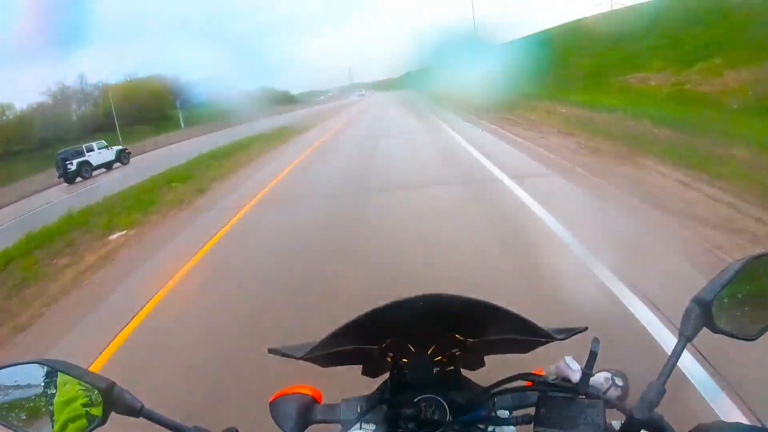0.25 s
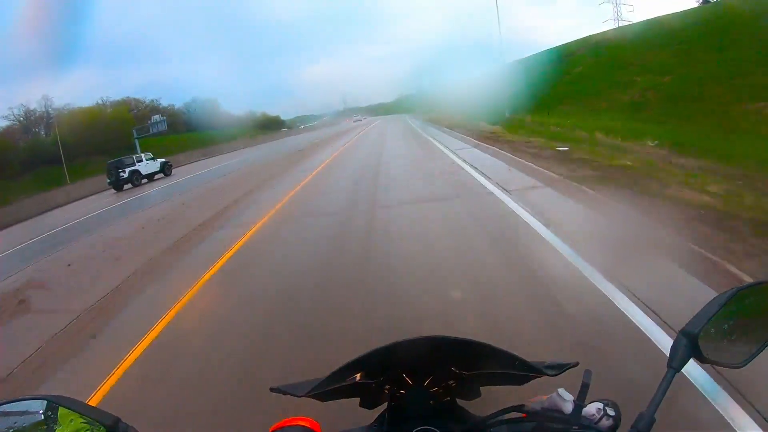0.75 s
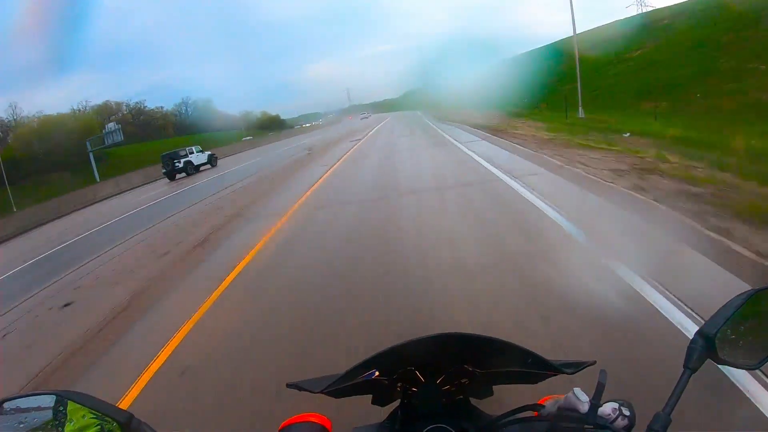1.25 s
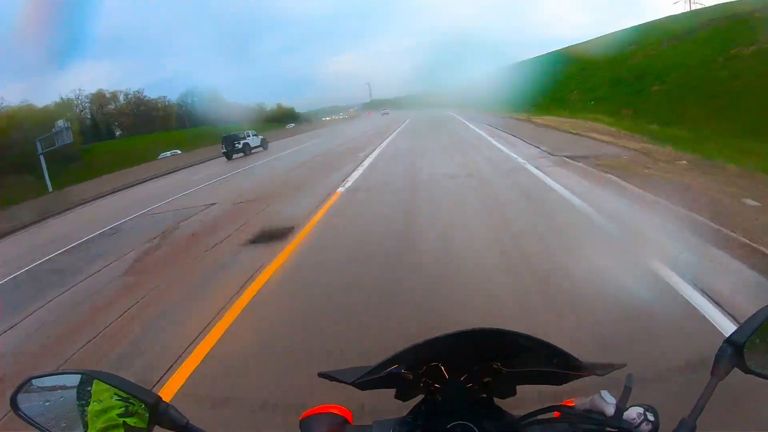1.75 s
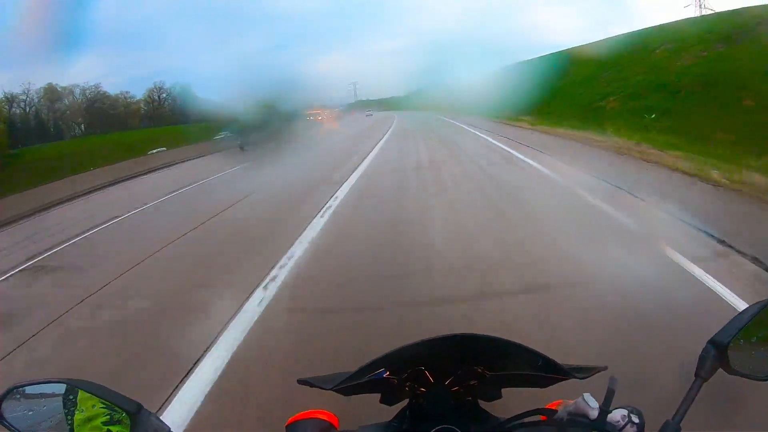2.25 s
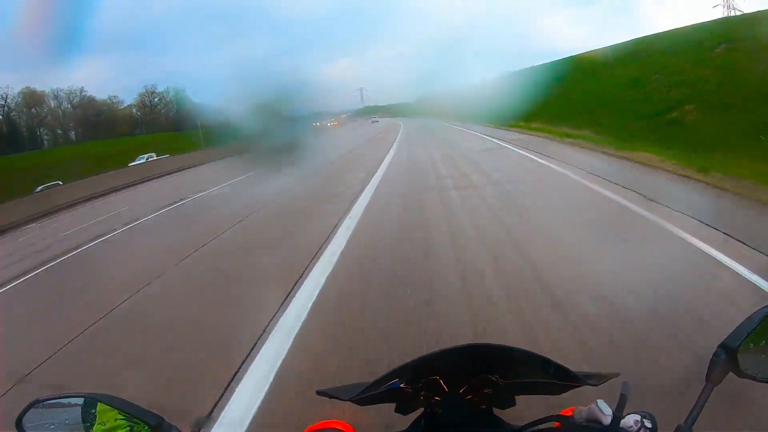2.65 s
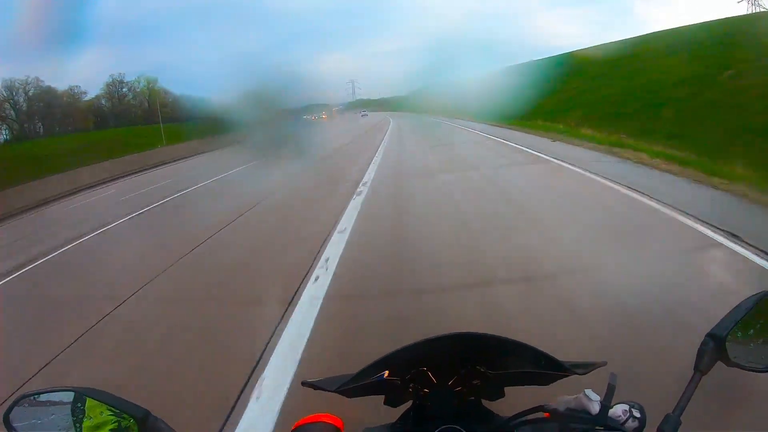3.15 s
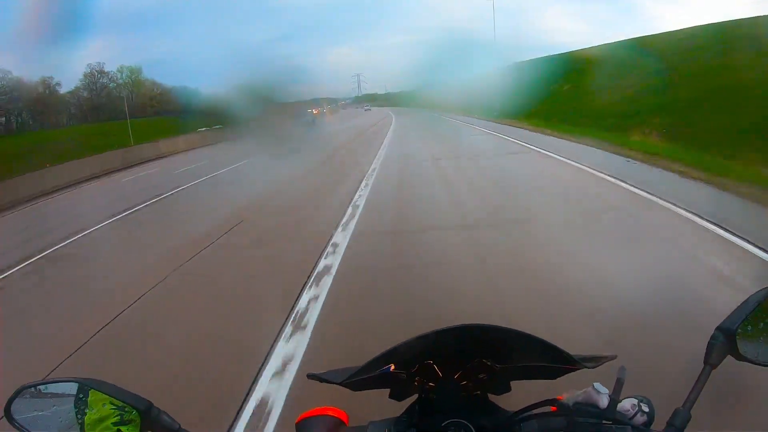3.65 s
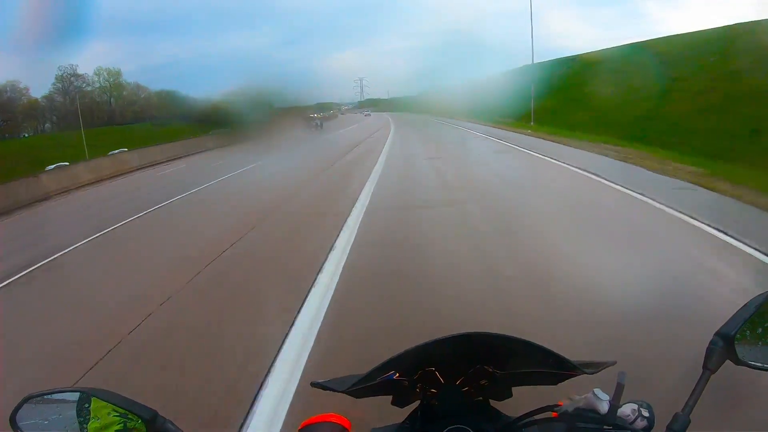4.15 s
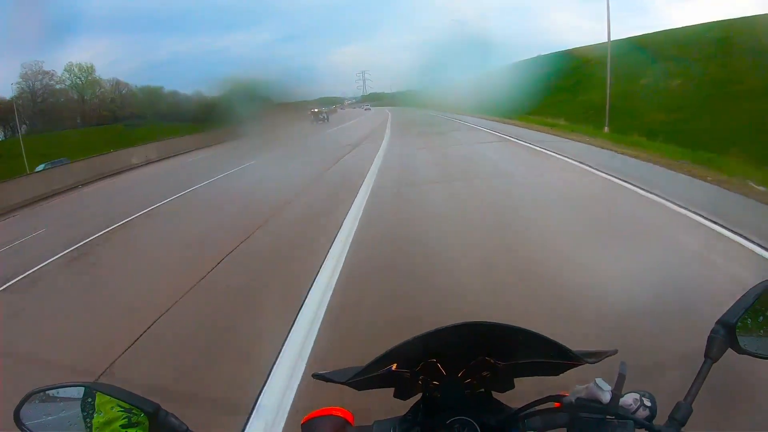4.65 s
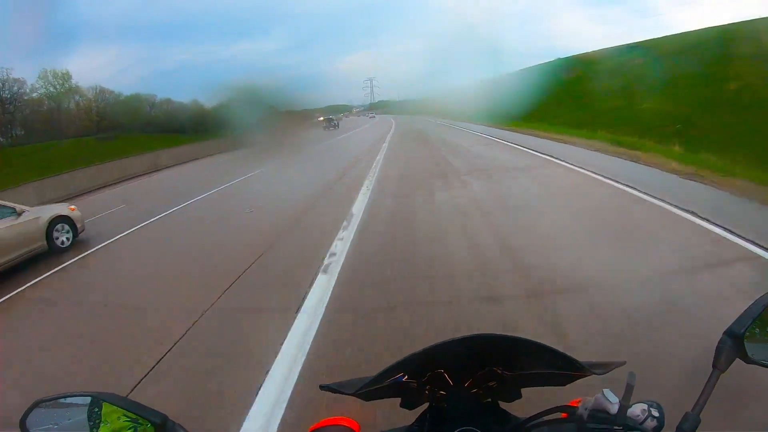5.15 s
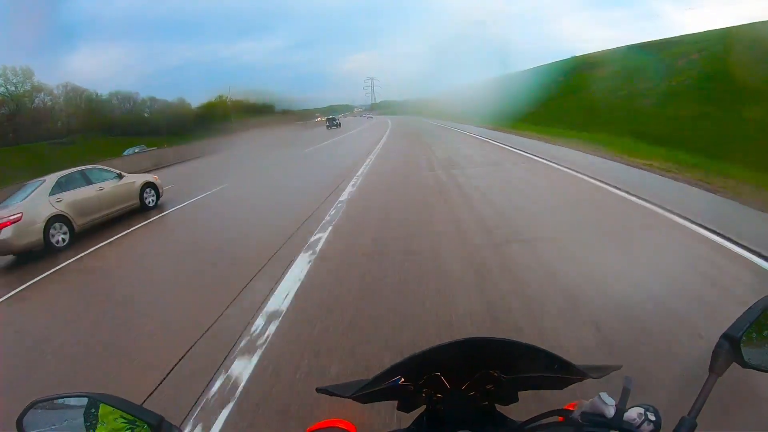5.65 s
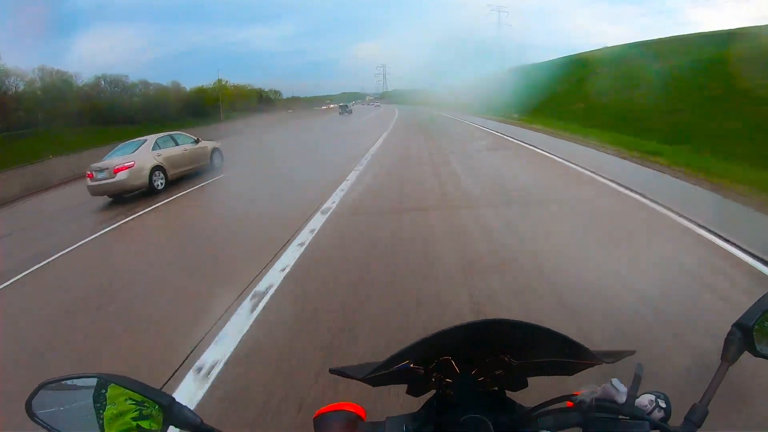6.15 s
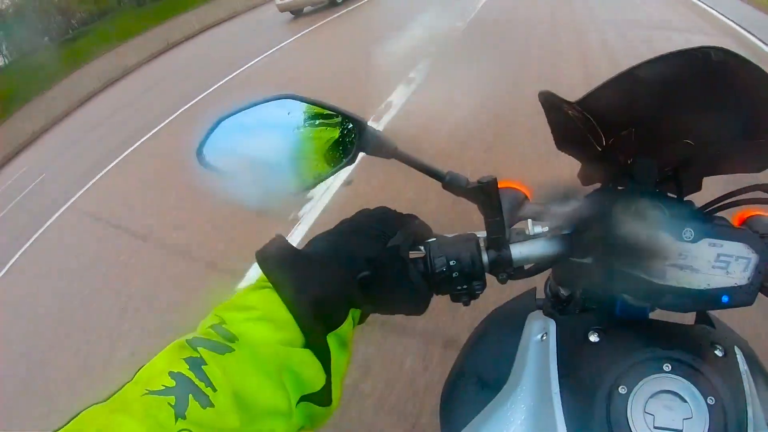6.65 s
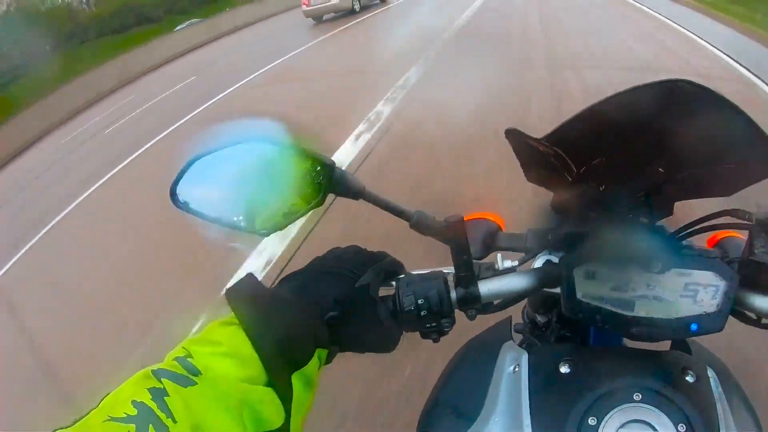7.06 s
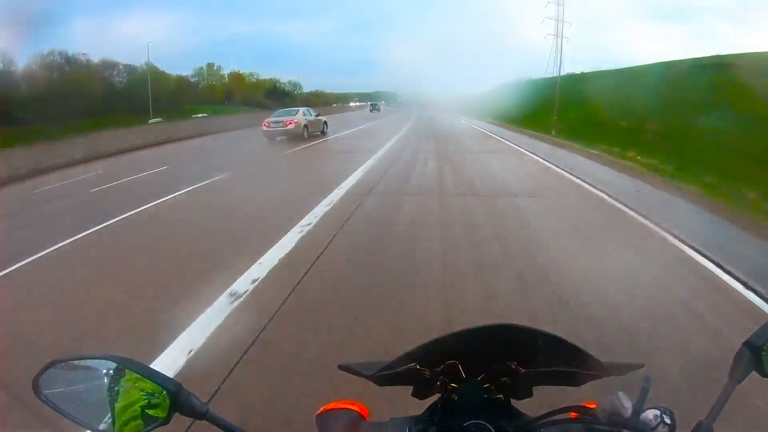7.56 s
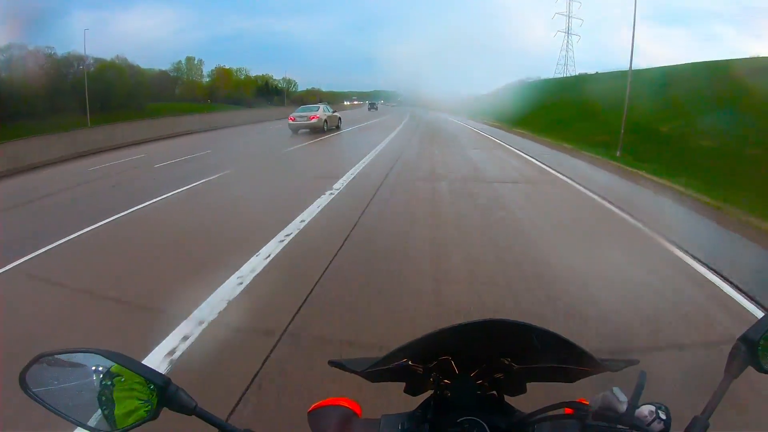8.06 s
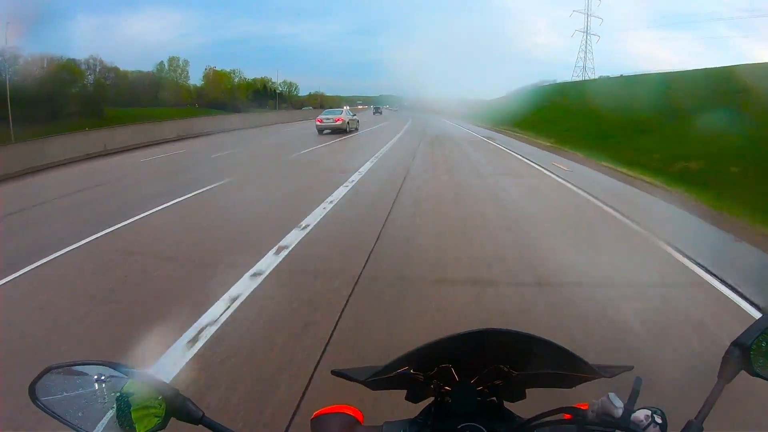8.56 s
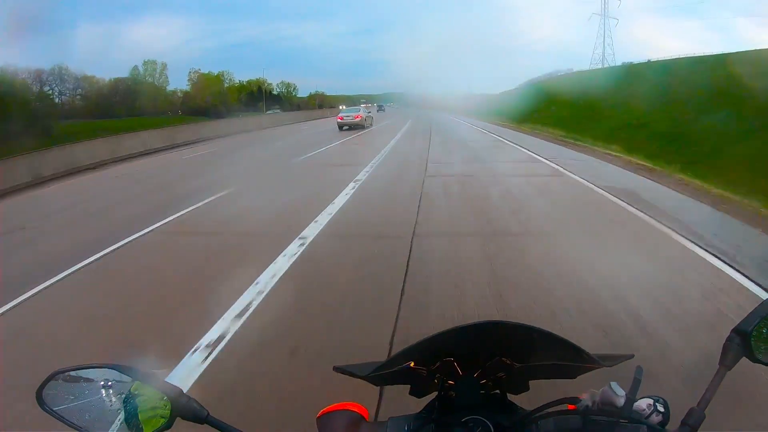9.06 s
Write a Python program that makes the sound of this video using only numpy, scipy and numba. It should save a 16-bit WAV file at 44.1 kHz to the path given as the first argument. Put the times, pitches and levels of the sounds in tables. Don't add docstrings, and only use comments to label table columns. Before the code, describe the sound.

A rider on a wet open highway, heard close and mono from the helmet. Wind overloads the microphone continuously: deep uneven throbbing, broad roaring air and an airy hiss. Blows of air cluster at the start and again after six seconds, when turning the head briefly shelters the microphone. The rush then comes back rougher and less airy on top, with tiny drop ticks almost buried.

```python
import sys
import numpy as np
from scipy import signal
from scipy.fft import rfft, irfft, next_fast_len
from scipy.io import wavfile
from scipy.ndimage import uniform_filter1d
from numba import njit

SR = 44100
rng = np.random.default_rng(int(sys.argv[2]) if len(sys.argv) > 2 else 0)


def volts(x):
    e = np.asarray(x, float) / 20
    return 10 ** e


def wav_out(sig):
    wavfile.write(sys.argv[1], SR, np.round(np.clip(np.atleast_2d(sig).T, -1, 1) * 32767).astype(np.int16))


N = 410130

# frequency in Hz, density in dB per Hz.
TYRE_SPECTRUM = [(1180, -29), (2000, -1), (2170, -7), (2640, -9), (3200, -17), (4120, -14), (4730, -8),
                 (6700, -21), (8710, -49.5), (14700, -120)]
# start in seconds, peak in dB.
DROPS = [(1.276, -68), (2.0852, -65), (2.5356, -56), (3.3697, -52.5), (3.6037, -60.5), (4.7731, -62),
         (5.3552, -58.5), (5.7588, -57), (5.9554, -66.5), (6.2896, -59.5), (6.7231, -66.5), (6.8064, -67.5),
         (7.8077, -72), (7.874, -59), (8.5265, -54), (8.7006, -63)]
# start in seconds, peak in dB, treble in dB re peak.
SLAPS = [(0.005, -18, -36), (0.078, -17.5, -15.5), (0.131, -12, -24), (0.285, -15, -17), (2.716, -10, -20),
         (3.62, -13, -22), (4.351, -14, -21), (5.298, -20, -29), (5.986, -13, -13), (6.321, -7.5, -18),
         (6.495, -14.5, -25), (6.72, -15, -17), (6.809, -11, -30), (6.854, -15, -28), (6.948, -22, -23),
         (7.029, -24, -17), (7.096, -23, -23), (7.294, -17, -10), (7.33, -11, -19), (7.473, -17, -29),
         (7.56, -7.5, -29), (7.734, -8.5, -20), (7.796, -11, -18), (8.544, -14, -18), (8.693, -15, -25),
         (8.798, -7.5, -26), (9.099, -16, -24)]

# frequency in Hz, density in dB per Hz.
STREAM_SPECTRUM = [(190, -29.5), (330, -6.5), (430, -3.5), (476, -4.5), (513, -6), (660, -7.5),
                   (1250, -10.5), (1930, -15.5), (2300, -22.5), (3570, -28.5), (4310, -35), (5550, -37.5),
                   (6700, -47), (8710, -65), (14700, -120)]
# frequency in Hz, density in dB per Hz.
UPRIGHT_SPECTRUM = [(350, -31), (600, -3.5), (715, -3), (1060, 1), (1680, -3), (2050, -6.5), (2300, -12.5),
                    (3000, -14), (3900, -45), (6600, -120)]
# frequency in Hz, width in Hz, gain in dB.
PORT_MODES = [
    (3840, 280, -5),
    (4250, 800, 3),
    (5000, 1160, 0),
]
# time in seconds, burst depth in dB.
BURST_DEPTH = [
    (0, 3.5),
    (.3, -0.3),
    (3, 1.34),
    (6.2, 1.5),
    (6.6, 2.8),
    (7.2, 3),
    (7.6, 1.5),
    (9.3, 3.0),
]
# time in seconds, shelter in dB, turn of the port from the flow (about 0-1,
# below 0 faces it more).
HEAD_POSTURE = [(0, -8, .1), (.2, -6, 0), (.36, -2, 0), (.8, -2, 0), (1.3, 1, 0), (2.5, 1, 0.08),
                (3.3, -1, 0.02), (4.6, 0, 0.15), (5.8, -1.5, 0), (6.315, -.5, 0.16), (6.35, -7.5, -.2),
                (6.9, -14.5, 0.4), (7.3, -7.5, 0.5), (7.45, -4, 0.76), (7.8, -2.5, 1.2), (8.3, -2, 1.1),
                (8.9, -4, 1.1), (9.3, -3, 0.66)]
# middle in seconds, length in seconds, strength in dB, extra turn (-1 to 1, below
GUSTS = [(0.055, 0.14, -5, 0.57), (1.8, 0.27, -0.5, 0.39), (2.104, .15, 0.5, -0.043), (2.5, 0.12, 1.5, .1),
         (3.6, 0.44, -0.5, .1), (3.964, 0.066, 2, -0.014), (4.03, .06, -2, .1), (4.146, .06, 2.5, -0.036),
         (5.0, 0.7, 2, 0.082), (4.353, 0.071, 1, -0.16), (4.846, 0.061, -3, .3), (5.103, .2, -.3, 0.42),
         (5.272, .06, 0, -0.56), (5.556, 0.11, -2, 0.02), (6.07, 0.17, 0.1, 0.66),
         (6.154, 0.035, 2.5, -0.62), (6.415, .05, -2, .1), (6.62, 0.33, 2.5, 0.33),
         (6.93, 0.32, -0.5, -0.051), (8.84, 0.042, -2, 0.1), (7.38, .05, 2, -0.081), (7.5, .1, -5, 0.19),
         (7.597, .07, 4.5, -0.21), (7.82, 0.041, 4.5, -0.73), (7.987, 0.17, 3.5, -0.11),
         (8.565, 0.028, -4.5, .3), (8.71, 0.031, 4, -.4), (9.005, 0.13, -2.5, 0.25),
         (9.12, .055, 4.5, -0.25), (9.239, 0.038, -6, 0.12)]
# middle in seconds, length in seconds, depth in dB.
LULLS = [(.045, .125, -16), (.155, .02, -6), (.24, 0.1, -3), (6.375, .025, -2), (6.77, 0.058, -0.5),
         (6.87, 0.031, -3), (6.93, 0.044, -2.5), (7.0, 0.056, -11), (7.065, 0.052, -13), (7.11, .015, -11),
         (7.49, .04, -2.5), (7.545, 0.033, -1), (9.07, 0.058, -1.5)]
# usual level in dB, shares of shelter, gust and lull, dB per unit of turn.
ROAR, RUSHING = (-25.7, 0.18, 0.46, 1, 0.5), (-25, 0.81, 0.8, 0.5, -.5)
SPRAY, RING = (-42.5, 1, .5, -0.1, 5), (-36.5, 0.75, 0.5, 0.2, -5)

# frequency in Hz, density in dB per Hz.
BUFFET_SPECTRUM = [(7.1, -42.5), (12, -11.5), (48, -0.5), (108, 0.5), (205, -3.5), (450, -13.5),
                   (580, -44.5), (990, -120)]
# time in seconds, strength in dB, size (-1 small to 1 large).
SHEDDING = [(0, -0.5, 1.1), (.5, -3.5, 0.28), (1.2, -1, -0.23), (1.8, 0, -0.4), (2.5, -2, -0.6),
            (3.1, 0, -0.33), (3.7, 1.5, 0.48), (4.5, -1, 0.35), (5.2, 1.5, 0.047), (5.8, -1, 0.49),
            (6.4, 0.5, 0.67), (6.9, 2, 0.72), (7.4, 1, 0.08), (7.9, 3.5, -0.098), (8.4, 2, 0.099),
            (8.9, 1, -0.3), (9.3, 1, -0.17)]
# middle in seconds, length in seconds, strength in dB, pitch in Hz.
EDDIES = [(0.194, .08, 7, 90), (.2, .1, -10, 30), (.88, 0.068, 7.5, 90), (1.246, 0.074, 5, 90),
          (1.68, 0.046, 7, 220), (1.08, .25, 6.5, 170), (2.17, .15, 4, 30), (2.477, .08, 8, 90),
          (2.48, .1, -12, 30), (3.53, .08, 10, 30), (4.14, .08, 3.5, 90), (4.33, 0.052, 7, 90),
          (4.5, 0.056, 11, 35), (4.66, 0.073, 1, 90), (.12, .25, -3.5, 160), (5.53, .1, 7.5, 30),
          (6.14, 0.066, 3, 90), (6.55, .2, 4, 70), (6.304, 0.095, 7, 60), (6.678, 0.3, 6.5, 240),
          (7.074, 0.057, -9, 219), (7.15, 0.13, 3, 130), (7.35, 0.09, 6.5, 30), (7.578, 0.067, 4.5, 90),
          (7.8, 0.18, 3, 220), (8.445, .2, 1.5, 90), (9.15, 0.28, 4.5, 40), (8.697, 0.056, 7.5, 220),
          (8.78, 0.067, 6, 30), (8.95, 0.079, 6, 220)]
# centre in Hz, usual level in dB, dB per unit of size.
HEAVE, THUMP, FLUTTER = (34, -26, 4.4), (110, -19.5, 3.1), (280, -21.5, -3.5)

# frequency in Hz, gain in dB.
HOUSING = [(6000, 0), (7000, 1), (8500, 8), (9400, 4.5), (10200, -7), (12500, -12.5)]


def level(x):
    return x / np.sqrt(np.mean(x ** 2))


def curves(table):
    s, *columns = np.transpose(table)
    return [np.interp(np.arange(N) / SR, s, column) for column in columns]


def walk(rate):
    hold = max(int(SR / rate), 2)
    stairs = np.repeat(rng.standard_normal(N // hold + 1), hold)
    return level(uniform_filter1d(uniform_filter1d(stairs, hold), hold)[:N])


def spells(rows, edge):
    t = np.arange(N) / SR
    corners = np.array([-1 - edge, edge - 1, 1 - edge, 1 + edge])
    return sum(h * np.interp(t, s + d / 2 * corners, [0, 1, 1, 0]) for s, d, h in rows)


def band(x, colour, lo_hz, hi_hz):
    hz = np.maximum(np.arange(N // 2 + 1) * SR / N, 1)
    place = np.log(hz / lo_hz) / np.log(hi_hz / lo_hz)
    window = np.sin(np.pi * np.clip(place, 0, 1))
    colour_hz, colour_db = np.transpose(colour)
    shape_db = np.interp(np.log(hz), np.log(colour_hz), colour_db)
    return irfft(rfft(x) * volts(shape_db) * window, N)


def bank(colour, lo_hz, hi_hz, shared_db, own_db, own_rate):
    edges = np.geomspace(lo_hz, hi_hz, num=6)
    total = np.zeros(N)
    for lo, hi in zip(edges, edges[2:]):
        noise = band(rng.standard_normal(N), colour, lo, hi)
        total += noise * volts(own_db * walk(own_rate))
    return level(total * volts(shared_db))


def steadied(x, usual, span_s, hold):
    k = int(span_s * SR)
    power = uniform_filter1d(uniform_filter1d(x ** 2, k), k // 2)
    swing = np.sqrt(power + 1e-6)
    return x * (usual / swing) ** hold


def road():
    return volts(-56) * bank(TYRE_SPECTRUM, 1700, 11000, .8 * walk(40), .8, 4.2)


def drops():
    envelope = np.zeros(N)
    for s, peak_db in DROPS:
        envelope[int(s * SR)] = volts(peak_db - 8.0)
    envelope = uniform_filter1d(envelope, int(.028 * SR), origin=int(.009 * SR)) * 0.012 * SR
    bright = level(band(rng.standard_normal(N), [(8000, -5.5), (12500, 4)], 7100, 12000))
    return envelope * bright * volts(5.1 * walk(300))


def slaps():
    t, low, high = np.arange(N) / SR, np.zeros(N), np.zeros(N)
    for s, peak_db, treble_db in SLAPS:
        near = slice(int(s * SR), int((s + .04) * SR))
        since = t[near] - s
        puff = since / 0.0027 * np.exp(1 - since / 0.0025)
        low[near] += volts(peak_db - 6.5) * puff
        high[near] += volts(peak_db + treble_db - 7.5) * puff
    noise = rng.standard_normal(N)
    body = steadied(level(band(noise, STREAM_SPECTRUM, 230, 3600)), 0.89, 0.003, 0.75)
    treble = level(band(noise, STREAM_SPECTRUM, 3000, 7500))
    return low * body + high * treble


def exposure():
    shelter, turn = curves(HEAD_POSTURE)
    edge = .2
    gust = spells([(s, d, h) for s, d, h, _ in GUSTS], edge) + 0.65 * walk(15)
    turn = turn + spells([(s, d, a) for s, d, _, a in GUSTS], edge) + 0.069 * walk(11)
    lull = spells(LULLS, .15)
    layers = (ROAR, RUSHING, SPRAY, RING)
    return [db + a * shelter + b * gust + c * lull + d * turn for db, a, b, c, d in layers]


def port_ring(x):
    hz = np.arange(N // 2 + 1) * SR / N
    gain = sum(volts(db) / (1 + (2 * (hz - f) / width) ** 2) for f, width, db in PORT_MODES)
    return irfft(rfft(x) * gain * np.exp(-(hz / 7200) ** 4), N)


def rush():
    roar_db, rush_db, spray_db, ring_db = exposure()
    arrivals = 0.66 * walk(25) + 0.45 * walk(55) + 0.58 * walk(140) + .5 * walk(90) ** 2
    bursts = curves(BURST_DEPTH)[0] * level(arrivals)
    bursts = bursts - 10 * np.log10(uniform_filter1d(volts(2 * bursts), int(.07 * SR)))

    roar = bank(STREAM_SPECTRUM, 269, 1007, 0.57 * bursts, 0.76, 25)
    hiss = bank(UPRIGHT_SPECTRUM, 710, 3000, 0.81 * bursts, 0.67, 28)
    spray = bank(STREAM_SPECTRUM, 1943, 7700, 0.57 * bursts, 1.3, 55)
    fine = bank(STREAM_SPECTRUM, 5140, 12000, .7 * bursts, .8, 25)

    ring_power = np.maximum(volts(2 * ring_db) - volts(2 * (spray_db - 3.0)), volts(2 * (ring_db - 5.0)))
    ring = level(port_ring(rng.standard_normal(N)) * volts(1.1 * bursts + .5 * walk(22)))
    fine_db = -59 + 0.22 * (ring_db + 41.0) + .55 * (spray_db + 44.0)
    broad = volts(roar_db + 0.63) * roar + volts(rush_db + 0.5) * hiss + volts(spray_db + 3.0) * spray
    return broad + np.sqrt(ring_power) * ring + volts(fine_db) * fine


def shedding():
    strength, size = curves(SHEDDING)
    reach_oct, wander_db = 0.74, 1.5
    levels = []
    for centre, db, tilt in (HEAVE, THUMP, FLUTTER):
        wander = wander_db * walk(12)
        lifts = [(s, d, h * np.exp(-(np.log2(hz / centre) / reach_oct) ** 2)) for s, d, h, hz in EDDIES]
        levels.append(db + strength + tilt * size + wander + spells(lifts, 0.66))
    return levels


def buffet():
    heave_db, thump_db, flutter_db = shedding()
    heave = steadied(bank(BUFFET_SPECTRUM, 9, 67, 0, .3, 6), 0.84, 0.073, 0.84)
    thump = steadied(bank(BUFFET_SPECTRUM, 50.9, 162.2, 0, .3, 13), 0.99, 0.18, 0.42)
    flutter = steadied(bank(BUFFET_SPECTRUM, 125.3, 412.6, 0, 0.88, 13), 0.77, 0.11, 0.22)
    push = volts(heave_db + 0.5) * heave + volts(thump_db + 0.44) * thump + volts(flutter_db + 2.08) * flutter
    usual = np.sqrt(volts(2 * heave_db) + volts(2 * thump_db) + volts(2 * flutter_db))

    t = np.arange(N) / SR
    opening_db, opening_hz, decay_s = -7.5, 74, 0.0086
    opening = volts(opening_db) * np.cos(2 * np.pi * opening_hz * t - 0.9) * np.exp(-t / decay_s)
    return steadied(push, usual, 0.012, 0.13) + opening


def scene():
    return (road() + drops() + slaps() + rush() + buffet())[None]


@njit
def follow(x, attack, release):
    e, out = .1, np.empty(len(x))
    for i in range(len(x)):
        e += (abs(x[i]) - e) * (attack if abs(x[i]) > e else release)
        out[i] = e
    return out


def limited(dry):
    threshold_db, ratio, attack_s, release_s = -14.5, 1.55, 0.0031, 0.037
    envelope = follow(dry[0], 1 / (attack_s * SR), 1 / (release_s * SR))
    gain = np.minimum(volts(threshold_db) / envelope, volts(5.5)) ** (1 - 1 / ratio)
    return np.tanh(.9 * dry * gain) / .9


def housed(x):
    size = next_fast_len(N + SR // 10)
    hz = np.arange(size // 2 + 1) * SR / size
    gain_db = 1.5 + np.interp(hz, *np.transpose(HOUSING))
    return irfft(rfft(x, size) * volts(gain_db), size)[:, :N]


def band_limit(x):
    return signal.sosfilt(signal.butter(12, 11900, fs=SR, output="sos"), x)


def record(dry):
    dulled = housed(limited(dry))
    mix = dulled * np.minimum((N + 8 - np.arange(N)) / 40, 1)
    return band_limit(mix)


dry = scene()
out = record(dry)
wav_out(out)
```